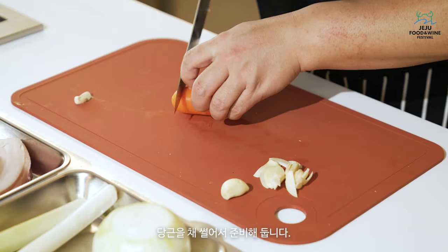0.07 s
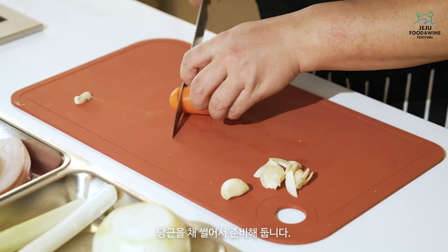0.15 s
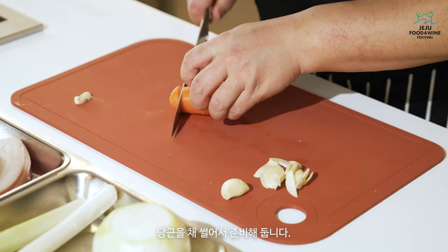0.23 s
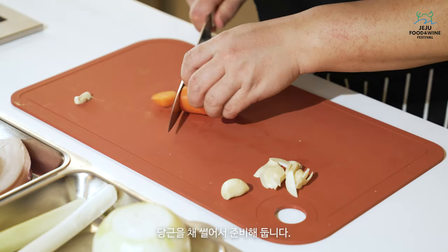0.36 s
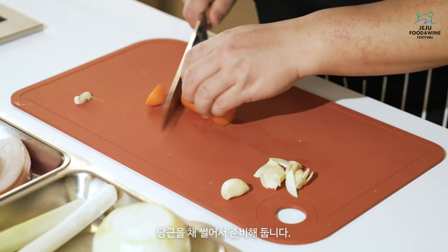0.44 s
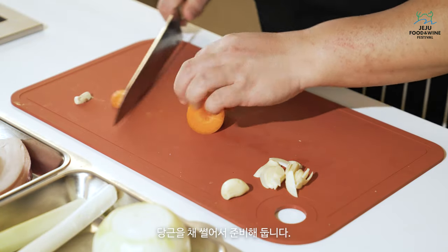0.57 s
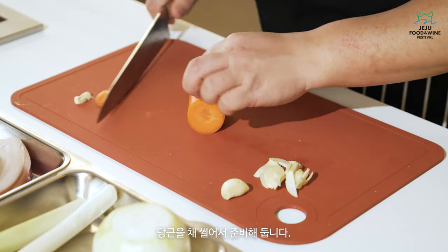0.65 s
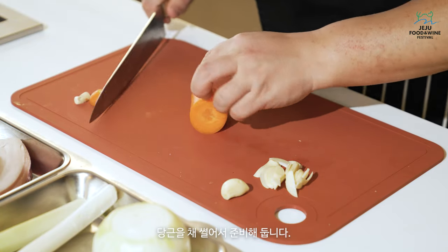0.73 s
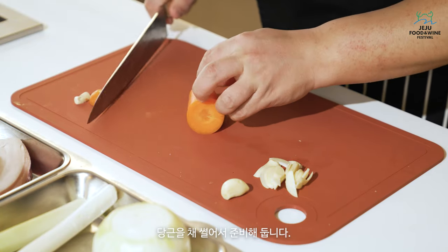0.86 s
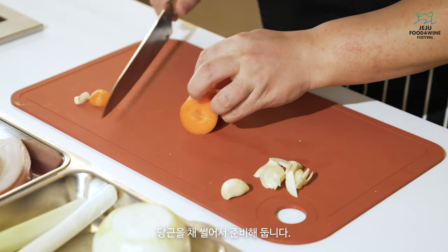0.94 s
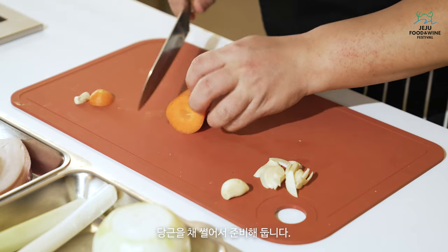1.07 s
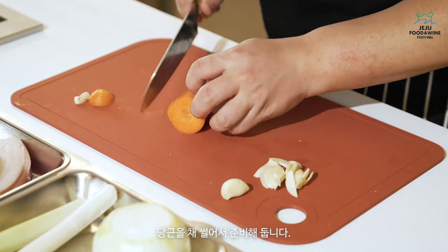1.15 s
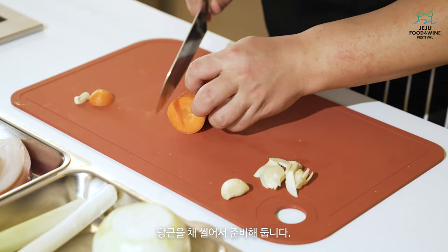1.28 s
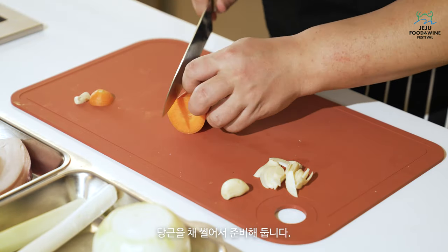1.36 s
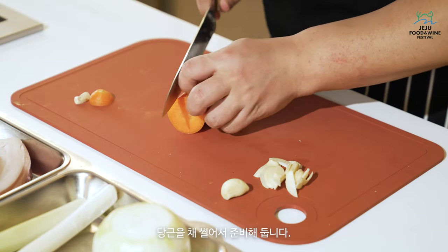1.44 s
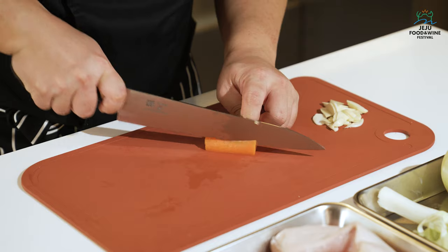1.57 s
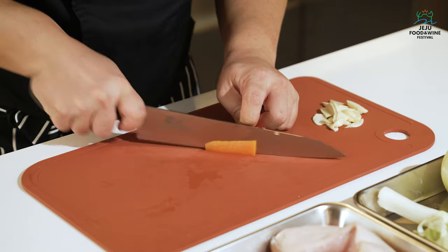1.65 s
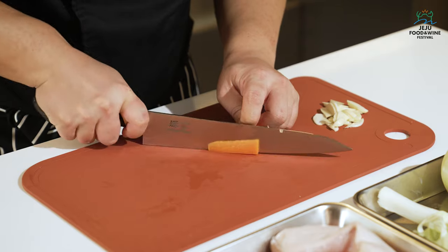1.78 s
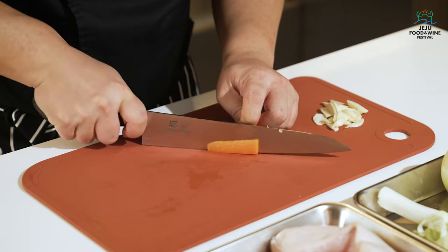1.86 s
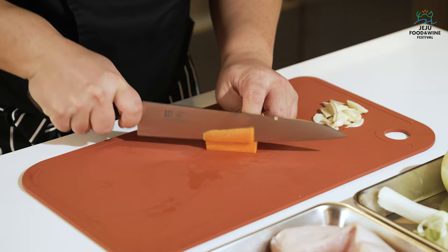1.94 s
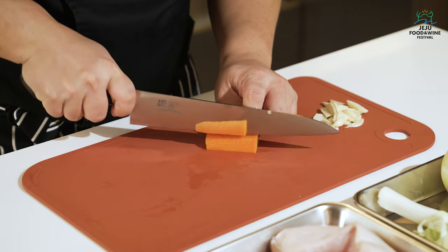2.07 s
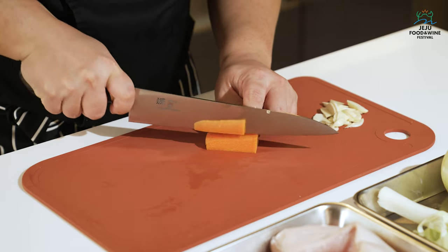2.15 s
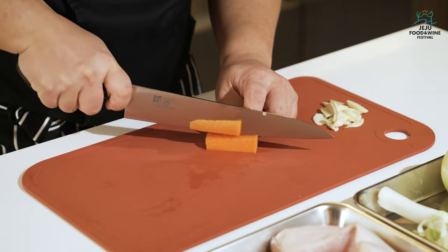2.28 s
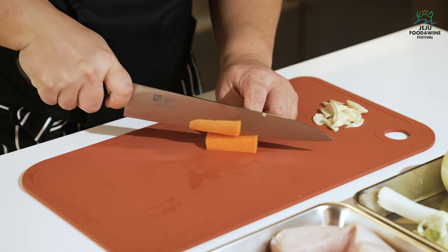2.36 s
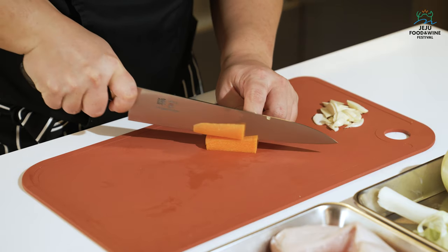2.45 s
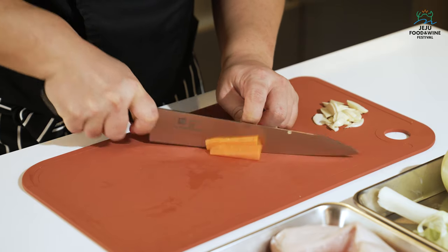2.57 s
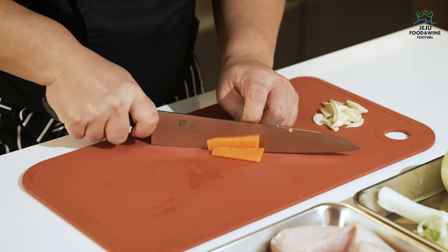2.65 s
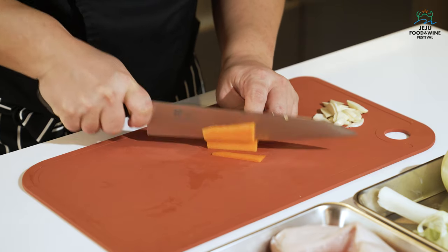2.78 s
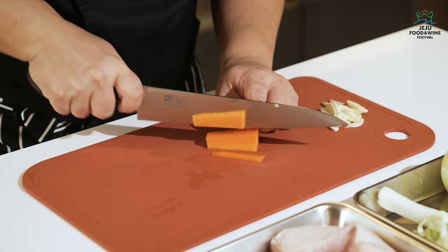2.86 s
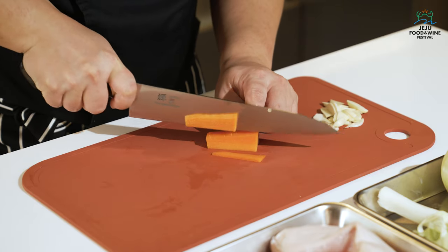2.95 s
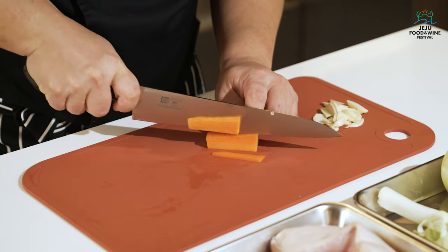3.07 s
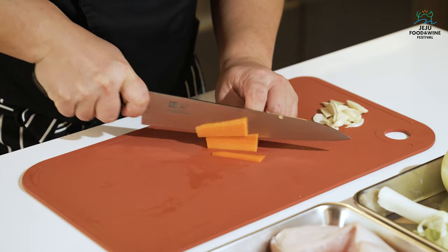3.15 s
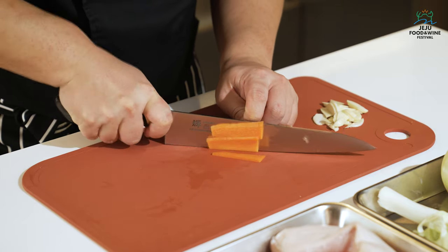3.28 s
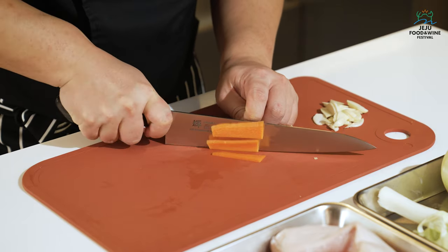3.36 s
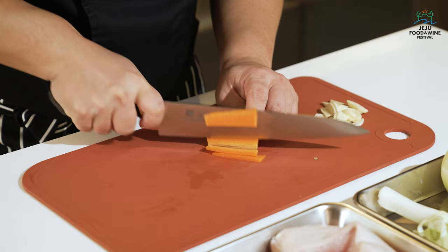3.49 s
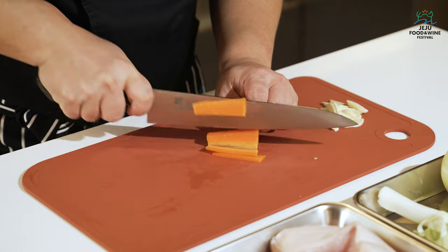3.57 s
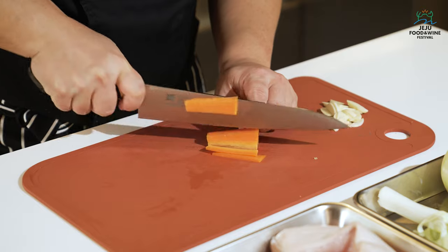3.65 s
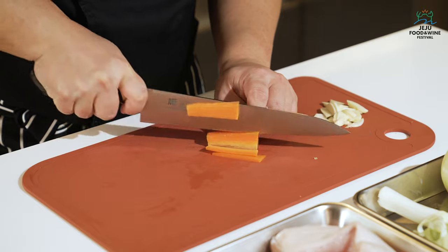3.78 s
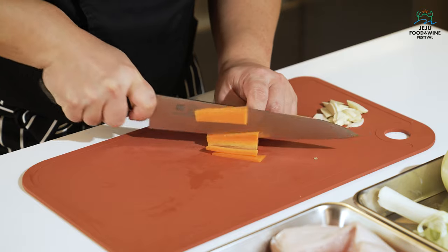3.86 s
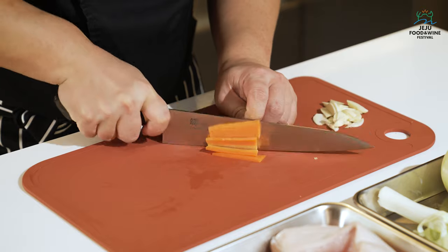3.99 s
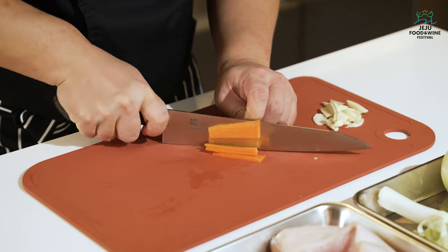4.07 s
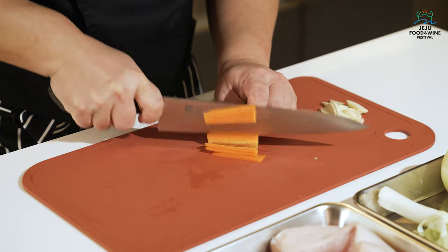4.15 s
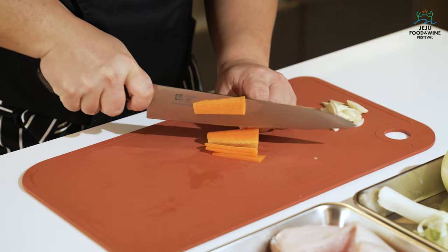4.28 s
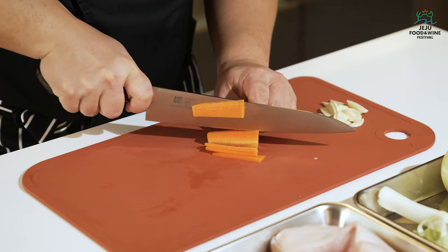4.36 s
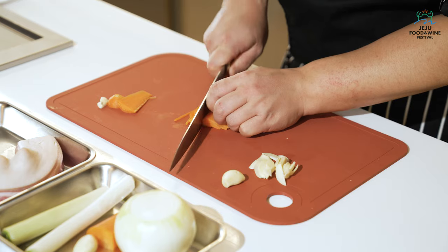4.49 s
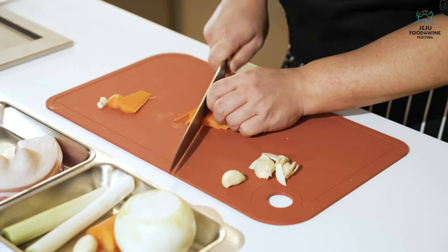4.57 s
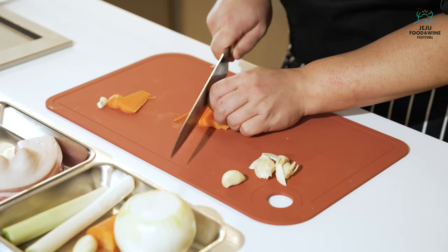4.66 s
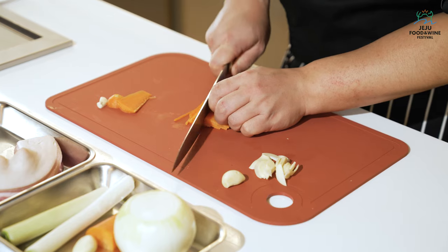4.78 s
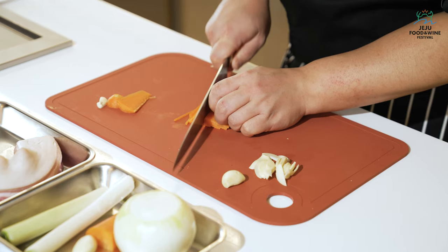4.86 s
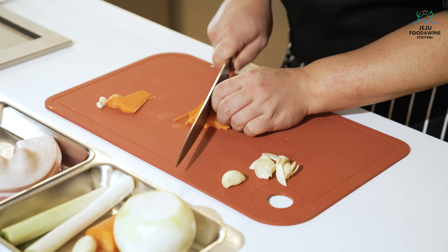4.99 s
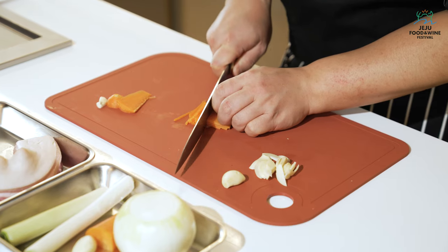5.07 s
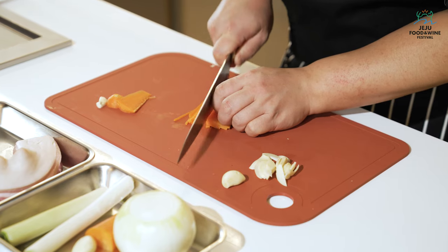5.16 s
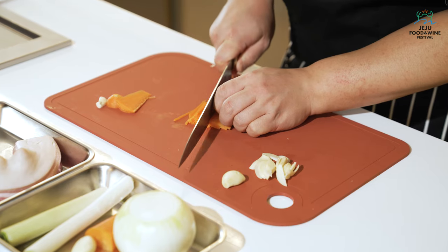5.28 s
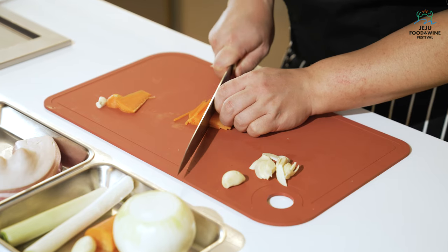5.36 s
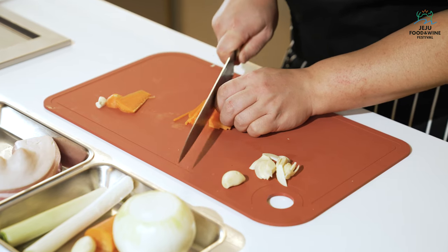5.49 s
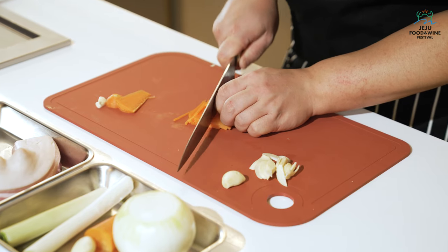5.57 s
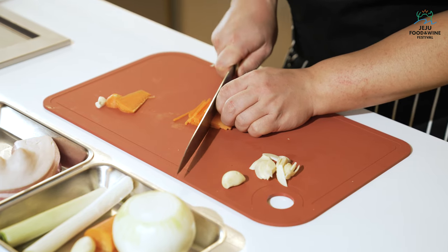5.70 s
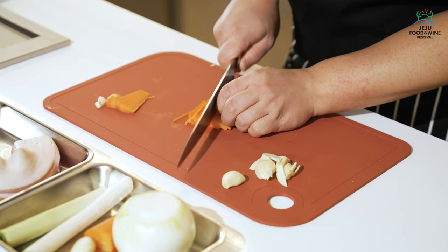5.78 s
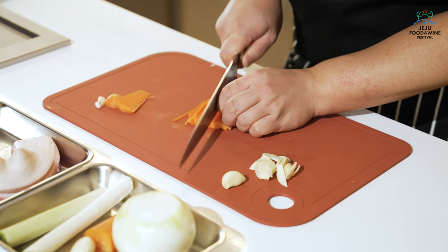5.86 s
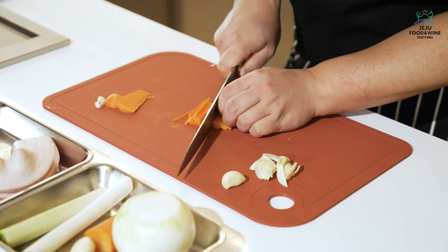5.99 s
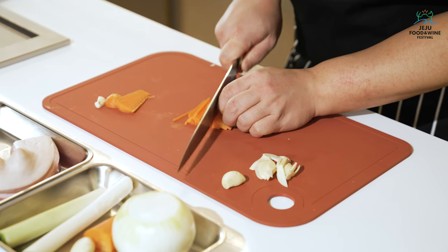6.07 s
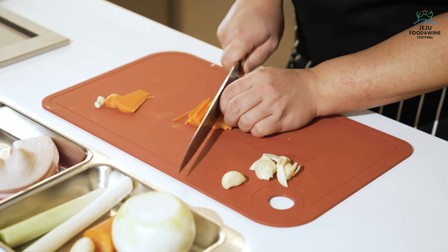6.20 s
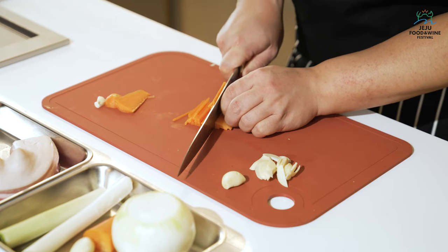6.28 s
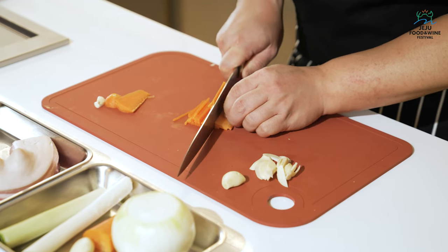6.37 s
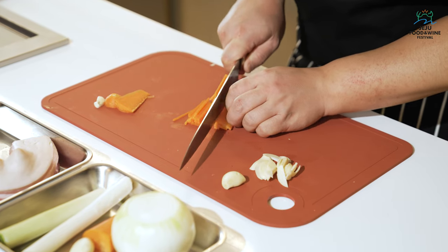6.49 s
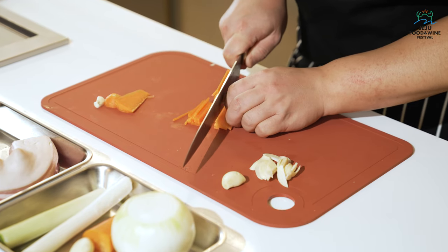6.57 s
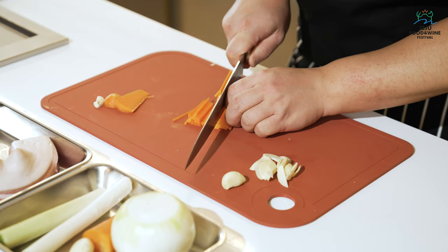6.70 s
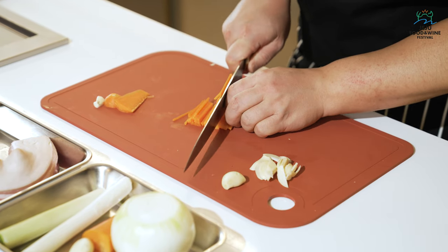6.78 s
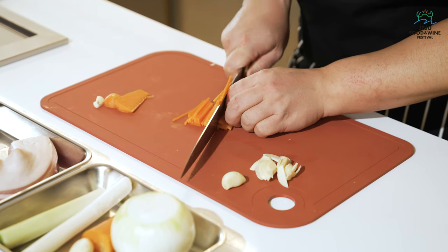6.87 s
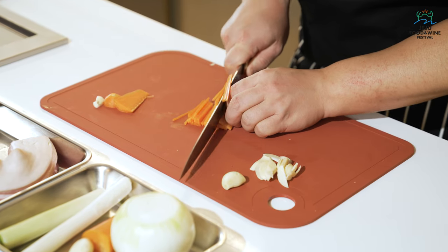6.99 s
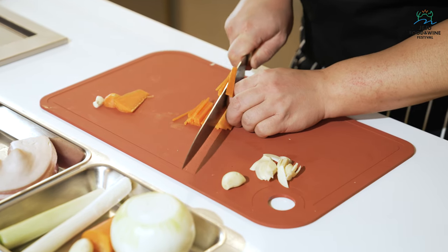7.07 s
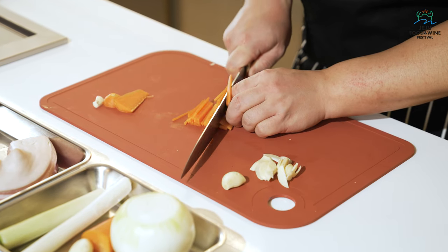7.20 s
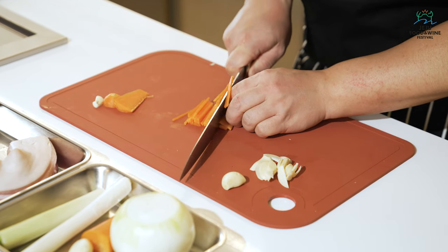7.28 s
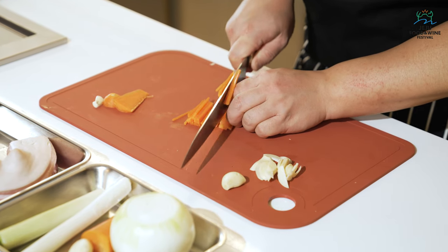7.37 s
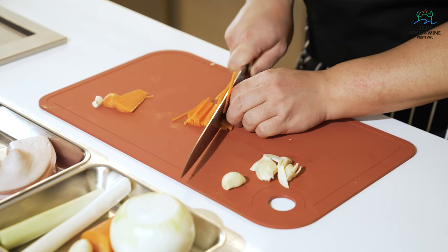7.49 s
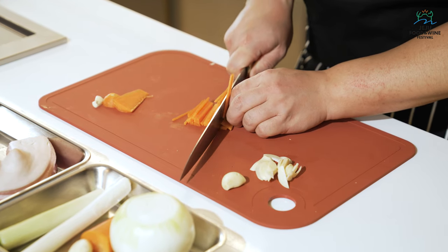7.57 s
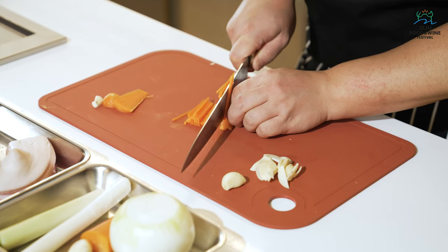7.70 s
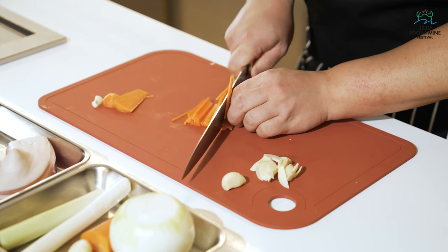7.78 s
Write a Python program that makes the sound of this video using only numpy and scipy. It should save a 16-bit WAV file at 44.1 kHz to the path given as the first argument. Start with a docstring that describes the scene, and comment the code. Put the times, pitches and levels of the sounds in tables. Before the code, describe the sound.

A close microphone catches a carrot splitting in a rapid crackle, a solid knock, then a short metallic drag of the knife edge. Slow single slices come next, each a swelling crisp crunch ending in a hollow board knock, with soft brushes and bumps between. From the middle on, chopping becomes quicker and uneven in strength, swaying the worktop in a small room with low background rumble.

```python
"""A small kitchen, quiet but for a low rumble: a chef's knife slices carrot on a plastic board on a worktop.
Flesh crunches and snaps as filtered click noise; heavy pushes sway the worktop as low sines; the edge then
knocks on the board as decaying modes plus a noise crack. Once the blade is dragged across the board: stick-slip
clicks ring its steel modes. Soft brushes and bumps fall in between. Decaying noise forms the room; the knocks
keep a long tail, louder for a stretch in the middle and cut down elsewhere."""
import sys
import numpy as np
from scipy import signal
from scipy.fft import rfft, irfft
from scipy.io import wavfile
from scipy.ndimage import uniform_filter1d

SR = 44100
rng = np.random.default_rng(int(sys.argv[2]) if len(sys.argv) > 2 else 0)


def store_wav(level_fs):
    """Save 16-bit WAV to argv[1]."""
    pcm = np.round(np.clip(np.atleast_2d(level_fs), -1, 1) * 32767)
    wavfile.write(sys.argv[1], SR, pcm.T.astype(np.int16))


N = 345744
TIME_S = np.arange(N) / SR

# Ventilation spectrum: (frequency [Hz], relative level [dB])
RUMBLE_SPECTRUM = [(20, -22), (43, -1), (95, -4), (160, -5), (195, -13), (300, -13.5), (500, -24),
                   (750, -25), (1300, -33), (1900, -38.5), (4000, -49.5), (9000, -54), (12000, -57),
                   (16000, -73)]
RUMBLE_RMS_DB = -56

# Near-wall reverberation spectrum: (frequency [Hz], level [dB])
NEAR_SPECTRUM = [(40, -6), (130, -6.5), (200, -3.5), (340, -1), (600, -5), (1000, -8), (2500, -9),
                 (5000, -3), (10000, -3), (16000, -6)]
# Long tail of the knocks: (frequency [Hz], level [dB])
LONG_TAIL_SPECTRUM = [(60, -6), (300, -5), (600, 2.5), (1000, 4.5), (1700, -1), (2600, -2), (3600, -17),
                      (12000, -30)]
# Decay of the near walls: (frequency [Hz], t60 [s])
NEAR_DECAY = [(100, 0.45), (400, 0.3), (1500, 0.28), (5000, 0.25), (11000, .27), (16000, 0.12)]
# Knock as the board radiates it to all sides: (frequency [Hz], relative level [dB])
RADIATED_SPECTRUM = [(30, -7.5), (60, 6.5), (130, -0.5), (200, -5.5), (330, 2), (600, -0.5), (1200, 0.5),
                     (2000, -8.5), (2900, -18.5), (3700, -25.5), (5000, -31.5), (9000, -42.5), (15000, -49)]

# Damped board modes: (frequency [Hz], relative level [dB], t60 [s])
BOARD_MODES = [(163, -6, 0.078), (292, -8, 0.0057), (393, -3.5, 0.04), (533, -4, 0.035), (692, -5, 0.026),
               (950, -2.5, 0.034), (1023, 1.5, .024), (1290, -5, 0.038), (1490, -5, 0.0077),
               (1718, -1, .026), (1890, -3, 0.008), (2200, -7.5, 0.012), (2560, -12.5, 0.025),
               (3050, -22.5, 0.035), (3370, -25, 0.02)]
# Low worktop modes: (frequency [Hz], relative level [dB], t60 [s])
WORKTOP_MODES = [(62, 8, 0.25), (76.6, 2, 0.29), (102.4, -2, 0.19), (131, -2.5, 0.17), (149.4, 3.5, .22),
                 (249, -3, 0.26), (342, -0.5, 0.18), (490, -3.5, .15), (562, -10, 0.28), (720, -7, .15)]
# Steel blade modes: (frequency [Hz], width [Hz], relative level [dB], change per unit of place [dB])
BLADE_MODES = [(1956, 18, 17, -25), (2665, 50, 20.5, -7.5), (3350, 60, 8.5, 0), (4120, 86, 11, 9),
               (4500, 32, 10.5, 3), (4980, 79, 14, 10), (5290, 72, 18.5, 3), (5815, 54, 15, 9),
               (6680, 20, 19, -10), (7630, 20, 18.5, 5), (8550, 36, 24, 4.5), (9590, 62, 14.5, 3),
               (9700, 70, 16.5, 2), (10480, 100, 16, 4), (11300, 70, 13.5, 9.5), (11660, 80, 16.5, 3.5),
               (12450, 110, 17, 5.5), (12750, 110, 14.5, -1.5), (13730, 110, 14.5, 9), (14200, 120, 6.5, 5),
               (14980, 110, 20, 1), (15570, 100, 14, 2)]

# Noise of the edge on the board: (frequency [Hz], relative density [dB per Hz])
CRACK_SPECTRUM = [(100, -1.5), (400, 0.5), (1200, -1.5), (2100, -6.5), (2800, -20.5), (3600, -19),
                  (5000, -32.5), (9000, -35.5), (15000, -44)]
# Crisp bursting cells: (frequency [Hz], relative density [dB per Hz])
CRUNCH_SPECTRUM = [(300, -42), (1000, -22), (1600, -3.5), (3000, -6.5), (4500, -3), (7000, -4), (11000, -2),
                   (15500, -7)]
# Body of the carrot: (frequency [Hz], relative density [dB per Hz])
FLESH_SPECTRUM = [(200, -29), (950, -14.5), (1300, -3), (1750, 2.5), (2050, -9.5), (2600, -10.5),
                  (3400, -7.5), (4300, -17.5), (9000, -28.5)]
# Steel edge slipping on plastic: (frequency [Hz], relative density [dB per Hz])
FRICTION_SPECTRUM = [(150, -41), (450, -11), (800, -21), (1400, 10.5), (2300, 1.5), (6000, -2.5),
                     (11000, -1.5), (15500, -7.5)]
# Rasp of the board: (frequency [Hz], relative level [dB])
RASP_SPECTRUM = [(250, -20.5), (450, -13), (750, -12.5), (1300, 2.5), (2400, -11.5), (6000, -29)]
# Softness of a bump: (frequency [Hz], gain [dB])
BUMP_RESPONSE = [(130, -3.0), (400, -8), (1000, -17.0)]

# Blade brushing the carrot: (start [s], length [s], hiss level [dB], body level [dB])
BRUSH_EVENTS = [(0.066, 0.18, -74, -85), (1.185, 0.18, -71, -73.5), (2.773, 0.016, -95, -55.5),
                (3.607, 0.086, -92, -68.5), (3.913, 0.088, -78, -65)]
BRUSH_EASE_DB, BRUSH_ATTACK_DB_PER_S, BRUSH_RELEASE_DB_PER_S = 7.5, 900, 400.5

# Slices and fingers bumping the board: (time [s], relative level [dB])
BUMP_EVENTS = [(3.602, -43.5), (3.635, -41), (3.857, -44.5), (4.303, -35.5), (4.439, -46)]
# Heavy pushes swaying the worktop: (start [s], length [s], level [dB], pitch [Hz])
PUSH_EVENTS = [(4.499, .14, -36, 60), (5.055, 0.053, -21, 61), (5.321, .08, -17, 59.8),
               (5.658, 0.062, -30.5, 69.3), (5.956, 0.021, -32.5, 63.5), (6.005, 0.019, -15, 72.7),
               (6.285, 0.038, -25.5, 74.6), (6.903, 0.026, -26, 73), (7.245, 0.0373, -28, 70.7),
               (7.552, 0.067, -25, 73.6)]

# Drag: pressed on quickly, easing off, lifted
DRAG_START_S, DRAG_END_S, DRAG_DB, DRAG_EASE_DB = 0.5344, 0.76, -35, 6
DRAG_ATTACK_DB_PER_S, DRAG_RELEASE_DB_PER_S = 1101.5, 754
# Dragged edge catching on the plastic: (time [s], level re blade [dB])
CATCH_EVENTS = [(.563, -8.5), (.648, -7), (.7, -5.5)]
CATCH_HALF_WIDTH_S = 0.015

# Tough fibres snapping: (time [s], relative crack level [dB], body re crack [dB])
SNAP_EVENTS = [(1.941, -55.5, 3), (2.6602, -32, -1.5), (3.5021, -53.5, 14), (4.3002, -36, 2),
               (4.317, -31.5, -4), (4.4364, -42, -12), (4.554, -21, 0.5), (5.048, -41, 17),
               (5.059, -32, 15.5), (5.356, -33, 8), (6.0039, -30, 6.5), (6.014, -41.5, 20),
               (6.285, -35, 4.5), (6.901, -40, 11.5), (6.914, -33.5, 10.5), (7.251, -38, 8.5),
               (7.5696, -31, 8.5), (7.8251, -48, 13)]
# Thick end splits in a run of ever louder cracks
SPLIT_START_S, SPLIT_GAP_S, SPLIT_DB, SPLIT_STEP_DB = .175, .0077, -28.5, 1.62

# Knife strokes: (edge lands [s], time in the carrot [s], knock body level [dB], upper mids re body [dB],
# worktop ring re knock [dB], relative crunch level at the bottom [dB], crunch swell on the way down [dB])
STROKE_EVENTS = [ (0.2312, .054, -20.5, -6.5, -24, -28, 27), (1.7354, 0.11, -26, -7.5, -22, -50, 27),
                 (2.632, 0.093, -22, -4, -14.5, -47, 25.5), (3.3424, 0.032, -19, -2.5, -13, -38.5, 24),
                 (4.013, 0.1, -22.5, -8, -11.5, -38, 34), (4.303, 0.071, -47, -9.5, -3, -55.5, 2.5),
                 (4.555, 0.057, -28, -15, -14.5, -47.5, 3.5), (4.641, 0.06, -30.5, -8, -12, -43.5, 15),
                 (4.816, .043, -17, -6, -16, -46.5, 5), (5.1049, 0.064, -17.5, -6.5, -16.5, -43.5, 12.5),
                 (5.4, 0.078, -13.5, -2, -14, -38, 22), (5.696, .053, -31.5, -14.5, -10, -47, 13),
                 (6.034, 0.073, -19, -7.5, -13, -47, 12.5), (6.316, 0.07, -30, -15.5, -7, -43.5, 19),
                 (6.931, 0.12, -26.5, -14, -7.5, -46.5, 23.5), (7.2808, 0.075, -21.5, -4, -14.5, -40, 17),
                 (7.601, 0.073, -19, -5.5, -20.5, -49, 7)]
CRUNCH_RELEASE_DB_PER_S = 1100.5
BITE_DB = 13.5  # skin snap re crunch at entry
# Knocks landing in this span keep a louder long tail; elsewhere it is cut down
LOUD_TAIL_START_S, LOUD_TAIL_END_S = 3, 5.5
LOUD_TAIL_DB, CUT_TAIL_DB = -18.5, -33.5

RECORDER_TOP_HZ = 15800


def undb(db):
    """Decibels to gain."""
    return 10 ** (np.asarray(db) / 20)


def seconds(length_s):
    """Time axis of a short sound."""
    return np.arange(int(length_s * SR)) / SR


def fade(t, t60_s):
    """Exponential decay, 60 dB per t60."""
    return np.exp(-np.log(1000) * t / t60_s)


def unit(x):
    """Scale to rms 1."""
    return x / np.sqrt(np.mean(x ** 2))


def add(out, x, start_s):
    """Mix x into out from a start time on."""
    i = max(int(start_s * SR), 0)
    out[i:i + len(x)] += x[:max(N - i, 0)]


def lookup(points, hz):
    """Interpolate (Hz, value) points on a log-frequency axis."""
    f, value = np.transpose(points)
    return np.interp(np.log(np.maximum(hz, 1)), np.log(f), value)


def colour(x, points, size=4096):
    """Minimum-phase filter with the given (Hz, dB) response, via the folded cepstrum."""
    gain = undb(lookup(points, np.fft.rfftfreq(size, 1 / SR)))
    cepstrum = irfft(np.log(gain))
    cepstrum[1:size // 2] *= 2
    cepstrum[size // 2 + 1:] = 0
    impulse = irfft(np.exp(rfft(cepstrum)))
    return signal.fftconvolve(x, impulse)[:len(x)]


def ring(modes, t, scatter_db, detune):
    """Struck modes of alternating sign; shares and pitches scatter with where the blow lands."""
    hz, db, t60_s = np.transpose(modes)[:, :, None]
    share, shift = rng.standard_normal((2, len(modes), 1))
    sign = (-1) ** np.arange(len(modes))[:, None]
    level = sign * undb(db + scatter_db * share)
    wave = np.sin(2 * np.pi * hz * (1 + detune * shift) * t)
    return np.sum(level * fade(t, t60_s) * wave, axis=0)


def band_level(x, low_hz, high_hz):
    """Rms of the first 20 ms of a blow within one band."""
    length = SR // 50
    power = np.abs(rfft(x[:length], SR)) ** 2  # 1 Hz bins
    return np.sqrt(2 * power[int(low_hz):int(high_hz)].sum() / SR / length)


def crackle(rate_hz, spread_db):
    """Dense tiny clicks of uneven size, rms 1."""
    x = np.zeros(N)
    where = rng.integers(0, N, int(rate_hz * N / SR))
    size = undb(spread_db * np.minimum(rng.exponential(size=len(where)), 3))
    x[where] = size * rng.standard_normal(len(where))
    return unit(x)


def unevenness(depth_db, smooth_samples):
    """Random gain with the given rms depth."""
    return undb(depth_db * unit(uniform_filter1d(rng.standard_normal(N), size=smooth_samples)))


def gesture(start_s, end_s, attack_db_per_s, release_db_per_s):
    """Gain that rises to 1 at the start, holds and falls after the end; and progress 0-1 through the hold."""
    db = attack_db_per_s * np.minimum(TIME_S - start_s, 0)
    db -= release_db_per_s * np.maximum(TIME_S - end_s, 0)
    gain, heard = np.zeros(N), db > -100
    gain[heard] = undb(db[heard])
    return gain, np.clip((TIME_S - start_s) / (end_s - start_s), 0, 1)


def rumble():
    """Steady low ventilation noise."""
    return undb(RUMBLE_RMS_DB) * unit(colour(rng.standard_normal(N), RUMBLE_SPECTRUM))


def room(x, tail_feed, near_db=-1, tail_t60_s=.62, tail_db=0, near_build_s=0.0045, tail_build_s=0.074):
    """Close walls give a short dense tail of noise; the knocks also get a long, slowly built one."""
    t = seconds(1)
    noise, hz = rfft(rng.standard_normal(len(t))), np.fft.rfftfreq(len(t), 1 / SR)
    near = np.zeros(len(t))
    centres_hz, t60s_s = np.transpose(NEAR_DECAY)
    for band, t60_s in zip(np.eye(len(centres_hz)), t60s_s):
        share = lookup(np.c_[centres_hz, band], hz)  # overlapping triangular bands
        near += irfft(noise * share, len(t)) * fade(t, t60_s)
    near *= np.minimum(t / near_build_s, 1) ** 2
    tail = rng.standard_normal(len(t)) * fade(t, tail_t60_s) * np.minimum(t / tail_build_s, 1)
    near = undb(near_db) * colour(near / np.linalg.norm(near), NEAR_SPECTRUM)
    tail = undb(tail_db) * colour(tail / np.linalg.norm(tail), LONG_TAIL_SPECTRUM)
    return (signal.fftconvolve(x, near) + signal.fftconvolve(tail_feed, tail))[:N]


def brushing():
    """The flat of the blade whispers against wet carrot, easing off as it slides."""
    hiss, body = np.zeros((2, N))
    for start_s, length_s, hiss_db, body_db in BRUSH_EVENTS:
        touch, progress = gesture(start_s, start_s + length_s, BRUSH_ATTACK_DB_PER_S, BRUSH_RELEASE_DB_PER_S)
        level = touch * undb(-BRUSH_EASE_DB * progress)
        hiss += undb(hiss_db) * level
        body += undb(body_db) * level
    rub = crackle(9000, 2.5)
    return hiss * unit(colour(rub, CRUNCH_SPECTRUM)) + body * unit(colour(rub, FLESH_SPECTRUM))


def bumps():
    """Soft contacts wake mainly the low worktop modes."""
    out, t = np.zeros(N), seconds(.3)
    for start_s, db in BUMP_EVENTS:
        x = ring(WORKTOP_MODES, t, scatter_db=3, detune=.02) * fade(t, .3)
        add(out, undb(db) * colour(x, BUMP_RESPONSE), start_s)
    return out


def sway(rise_db=5, t60_s=0.1, onset_s=.018, upper_hz=100, upper_db=-8):
    """A heavy push sways board and worktop, then dies away; a higher mode joins as the force peaks."""
    out = np.zeros(N)
    for start_s, length_s, db, hz in PUSH_EVENTS:
        t = seconds(length_s + .3)
        swell = undb(rise_db * np.minimum(t / length_s - 1, 0)) * fade(np.maximum(t - length_s, 0), t60_s)
        wave = np.sin(2 * np.pi * hz * t)
        wave += undb(upper_db) * swell * np.sin(2 * np.pi * upper_hz * t)
        add(out, undb(db) * swell * np.minimum(t / onset_s, 1) * wave, start_s)
    return out


def steel(x, share_db, place=0):
    """A contact noise plus the blade modes it excites from a place on the edge (-.5 to .5)."""
    modes = np.zeros(N)
    for hz, width_hz, db, change_db in BLADE_MODES:
        mode = signal.lfilter(*signal.iirpeak(hz, hz / width_hz, SR), x)
        modes += undb(db + change_db * place) * mode
    return x + undb(share_db) * modes


def scraping(blade_db=-1, judder_db=3, board_db=-16, stutter_db=1.0, travel=.85):
    """The edge sticks and slips on the plastic and sings in its modes; the board rasps where it catches."""
    pressed, progress = gesture(DRAG_START_S, DRAG_END_S, DRAG_ATTACK_DB_PER_S, DRAG_RELEASE_DB_PER_S)
    drag = pressed * undb(DRAG_DB - DRAG_EASE_DB * progress ** 2)
    slips = crackle(12000, 2.2) * unevenness(stutter_db, 150)
    blade = steel(colour(slips, FRICTION_SPECTRUM), blade_db, travel * (progress - .5))
    blade /= np.std(blade[pressed > .5])
    judder = unevenness(judder_db, 1300)
    rasp = unit(judder * colour(slips, RASP_SPECTRUM))
    grip = np.full(N, undb(board_db))
    for catch_s, db in CATCH_EVENTS:
        grip += undb(db) / (1 + ((TIME_S - catch_s) / CATCH_HALF_WIDTH_S) ** 4)
    return drag * (blade + grip * rasp)


def snaps(snap_db=-10.0, t60_s=0.029, rise_s=0.0014, bite_body_db=1, split_body_db=-1, split_count=7):
    """Skin and tougher fibres give way with a short crack; deep ones ring the carrot's body."""
    bites = [(lands_s - length_s, db - swell_db + BITE_DB, bite_body_db)
             for lands_s, length_s, *_, db, swell_db in STROKE_EVENTS]
    split = [(SPLIT_START_S + k * SPLIT_GAP_S, SPLIT_DB + k * SPLIT_STEP_DB, split_body_db)
             for k in range(split_count)]
    crisp, flesh = np.zeros((2, N))
    t = seconds(.06)
    crack = np.minimum(t / rise_s, 1) * fade(t, t60_s)
    for start_s, db, body_db in [*bites, *split, *SNAP_EVENTS]:
        add(crisp, undb(db) * crack, start_s)
        add(flesh, undb(db + body_db) * crack, start_s)
    burst = crackle(12000, 1.3)
    crisp = crisp * unit(colour(burst, CRUNCH_SPECTRUM))
    flesh = flesh * unit(colour(burst, FLESH_SPECTRUM))
    return undb(snap_db) * (crisp + flesh)


def slicing(crunch_db=-5, flesh_db=1, blade_db=-19, patchy_db=1.5, depth_power=1.7, deepen=.3):
    """Cells burst in flurries along the edge, louder and fuller as it sinks; carrot and blade colour them."""
    cells, flesh = np.zeros((2, N))
    for lands_s, length_s, *_, db, swell_db in STROKE_EVENTS:
        t = seconds(length_s + .05)
        short_db = swell_db * (1 - np.minimum(t / length_s, 1) ** depth_power)  # shortfall from the bottom
        release_db = CRUNCH_RELEASE_DB_PER_S * np.maximum(t - length_s, 0)
        force = undb(db - short_db - release_db)
        add(cells, force, lands_s - length_s)
        add(flesh, force * undb(-deepen * short_db), lands_s - length_s)
    flurry = unevenness(patchy_db, 180)
    bursts = crackle(7000, 3) * flurry
    crisp = unit(steel(colour(bursts, CRUNCH_SPECTRUM), blade_db))
    body = unit(colour(bursts, FLESH_SPECTRUM))
    return undb(crunch_db) * cells * crisp + undb(flesh_db) * flesh * body


def knock(worktop_db, crack_db=-4, crack_t60_s=0.041, seat_s=.0045, seat_db=-2):
    """The edge hits the board; a moment later the board seats on the worktop, which rings on."""
    t = seconds(0.25)
    board = 0.44 * ring(BOARD_MODES, t, scatter_db=-2.0, detune=0.034)

    def blow():
        """Board modes plus a fresh crack of noise."""
        crack = unit(colour(rng.standard_normal(len(t)), CRACK_SPECTRUM))
        return board + undb(crack_db) * crack * fade(t, crack_t60_s)

    first, second = blow(), blow()
    lag_s = seat_s * (1 + .06 * rng.standard_normal())
    seat = np.interp(t - lag_s, t, second, left=0)
    worktop = .4 * ring(WORKTOP_MODES, t, scatter_db=2.5, detune=.012)
    return first + undb(seat_db) * seat + undb(worktop_db) * worktop


def chops(spread_db=43, spread_hard_db=3):
    """Knocks: direct, sent into the room, and feeding the long tail; carrot under the edge cushions the treble."""
    direct, spread, tail_feed = np.zeros((3, N))
    for start_s, _, db, hardness_db, worktop_db, *_ in STROKE_EVENTS:
        x = knock(worktop_db)
        body, upper = band_level(x, 200, 1000), band_level(x, 1200, 3500)
        tilt_db = hardness_db - 20 * np.log10(upper / body)
        add(direct, colour(x, [(650, 0.0026), (1400, tilt_db)]) * undb(db) / body, start_s)
        # the walls hear the board from all sides, so its peaks and notches even out
        pulse = colour(signal.unit_impulse(len(x)), RADIATED_SPECTRUM)
        pulse = colour(pulse, [(650, 0.0024), (1400, hardness_db + spread_hard_db)])
        pulse = pulse * undb(db + spread_db)
        add(spread, pulse, start_s)
        loud_tail = LOUD_TAIL_START_S < start_s < LOUD_TAIL_END_S
        add(tail_feed, pulse * undb(LOUD_TAIL_DB if loud_tail else CUT_TAIL_DB), start_s)
    return direct, spread, tail_feed


def scene(scrape_db=2, scrape_room_db=-7):
    """Knife, board and worktop in the kitchen; the flat of the blade beams its scrape at the microphone."""
    knocks, spread, tail_feed = chops()
    small = slicing() + snaps() + brushing() + bumps()
    scrape = undb(scrape_db) * scraping()
    tails = room(spread + small + undb(scrape_room_db) * scrape, tail_feed)
    return (knocks + small + scrape + sway() + tails + rumble())[None]


def record(dry):
    """The deepest bass is dropped; the recorder clips at full scale and cuts the top."""
    bass_cut = signal.butter(2, 36, "high", fs=SR, output="sos")
    top_cut = signal.ellip(10, .1, 80, RECORDER_TOP_HZ, fs=SR, output="sos")
    x = signal.sosfilt(bass_cut, dry)
    return signal.sosfilt(top_cut, np.clip(x, -1, 1))


dry = scene()
out = record(dry)
store_wav(out)
```